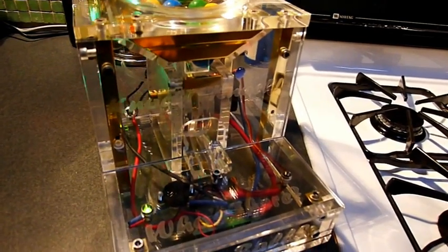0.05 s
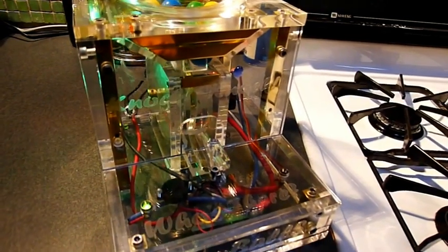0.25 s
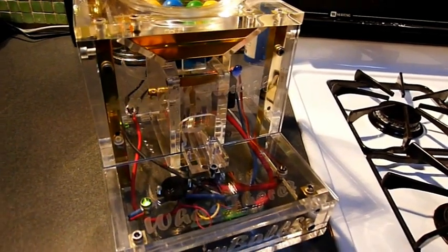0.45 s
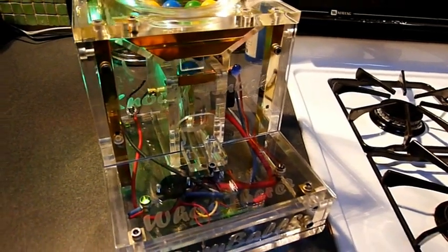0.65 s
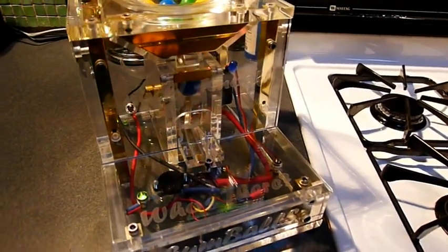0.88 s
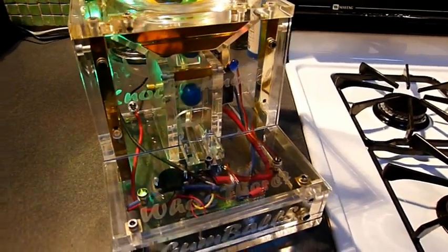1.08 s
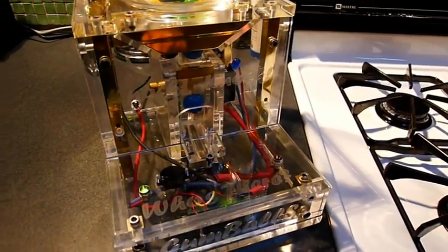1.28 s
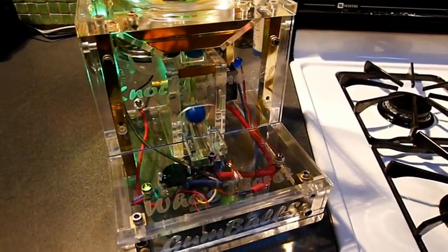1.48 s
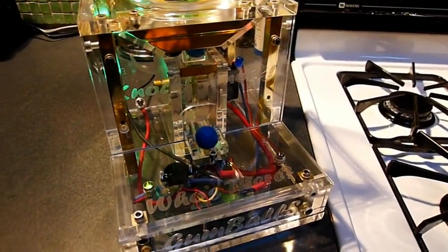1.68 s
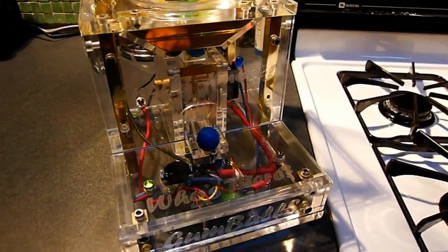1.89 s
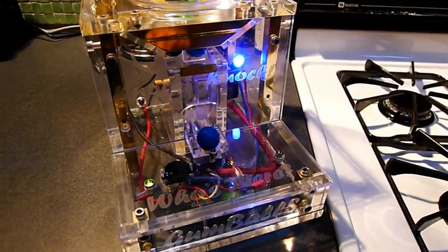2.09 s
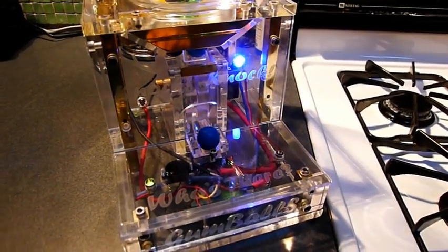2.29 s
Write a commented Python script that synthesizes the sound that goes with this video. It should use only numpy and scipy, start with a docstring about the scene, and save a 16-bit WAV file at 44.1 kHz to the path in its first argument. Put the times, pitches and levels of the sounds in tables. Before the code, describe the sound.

A gumball rattles through a plastic dispenser. A small motor rasps softly as the balls jostle, then one knocks down the chute, thuds into the tray and clacks twice, heard up close in a small kitchen.

```python
"""A servo-driven acrylic gumball dispenser on a kitchen counter, heard from close by. The servo (a small geared
motor) starts to rasp. Gumballs roll and jostle in the hopper, and one drops and knocks down the chute. At 1.5 s
it thuds into the tray, then hits the end stop with two sharp clacks. From about 2.1 s the servo rasps again, in
swells as loud as before, on to the end. A small room rings behind it all."""
import sys
import numpy as np
from scipy import signal
from scipy.fft import rfft, irfft
from scipy.io import wavfile
from scipy.ndimage import uniform_filter1d

SR = 44100
rng = np.random.default_rng(int(sys.argv[2]) if len(sys.argv) > 2 else 0)


def materialize(psi):
    """Save the field psi as 16-bit PCM at rate SR to the path in sys.argv[1].

    A 1-D psi becomes a single channel; in a 2-D psi each row is a channel.
    """
    bounded = np.clip(np.atleast_2d(psi).T, -1, 1)
    quanta = np.round(bounded * 32767).astype(np.int16)
    wavfile.write(sys.argv[1], SR, quanta)


N = 108045
HIT_SAMPLES = 8192
T, HZ = np.arange(HIT_SAMPLES) / SR, np.fft.rfftfreq(HIT_SAMPLES, 1 / SR)  # axes of one hit

# tone of a hard shell's tick: (frequency [Hz], level [dB])
TICK_TONE = [(1000, -28), (3000, 7.5), (6000, -5), (9000, -16.5), (12000, -31), (16000, -40)]
TICK_T60 = 0.021  # a "t60" is the time in seconds to fade by 60 dB; here, that of the highs


def amp(db):
    """Turns decibels into a gain."""
    return 10 ** (np.asarray(db) / 20)


def unit(x):
    """Scales a sound to an average (rms) level of 1."""
    return x / np.sqrt(np.mean(x ** 2) + 1e-20)


def unit_hit(x, hold_s=0.011):
    """Scales a hit to the energy of level 1 held for hold_s."""
    return x * np.sqrt(hold_s * SR / (np.sum(x ** 2) + 1e-20))


def read(points, hz):
    """Reads between the rows of a (frequency, value) table, spaced by octaves."""
    row_hz, value = np.transpose(points)
    return np.interp(np.log(hz + 1), np.log(row_hz), value)


def level(points):
    """Gain over the whole scene, from rows of (time [s], level [dB])."""
    return amp(np.interp(np.arange(N) / SR, *np.transpose(points)))


def add(mix, start_s, sound):
    """Mixes a sound in at the given time."""
    part = mix[..., max(round(start_s * SR), 0):][..., :sound.shape[-1]]
    part += sound[..., :part.shape[-1]]


def stereo(mid, side):
    """Left and right, from what the ears share (mid) and what sets them apart (side)."""
    return np.array([mid + side, mid - side])


def coloured(x, tone):
    """Gives a long sound the tone in a table, at level 1."""
    hz = np.fft.rfftfreq(len(x), 1 / SR)
    return unit(irfft(rfft(x) * amp(read(tone, hz)), len(x)))


def prompt_filter(log_gain):
    """The filter with this gain that answers a hit as early as it can (minimum phase)."""
    cepstrum = irfft(log_gain)
    cepstrum[1:HIT_SAMPLES // 2] *= 2
    cepstrum[HIT_SAMPLES // 2 + 1:] = 0
    return np.exp(rfft(cepstrum))


def click(tone_db):
    """One clean, hard contact with this tone."""
    return unit_hit(irfft(prompt_filter(np.log(amp(tone_db)))))


def burst(tone_db, treble_t60, rise_s=0.000067, bass_stretch=1.43):
    """A struck part's many vibrations blur into dying noise; the lows outlast the highs."""
    noise = rfft(rng.standard_normal(HIT_SAMPLES))
    lows = 1 / (1 + (HZ / 1500) ** 4)
    attack = 1 - np.exp(-T / rise_s)
    spectrum = 0
    for share, t60 in [(lows, treble_t60 * bass_stretch), (1 - lows, treble_t60)]:
        band = unit_hit(irfft(noise * share) * attack * amp(-60 * T / t60))
        spectrum += rfft(band) * np.linalg.norm(share)
    # even out the noise's chance peaks while giving it the tone
    power = abs(uniform_filter1d(abs(spectrum) ** 2, 100))
    log_gain = np.log(amp(tone_db)) - 0.5 * np.log(power + 1e-9)
    return unit_hit(irfft(spectrum * prompt_filter(log_gain)))


def mode_bank(modes, rise_s=0.0005):
    """One dying tone for each mode, a pitch at which a part naturally rings."""
    hz, db, t60 = np.transpose(modes)[:, :, None]
    return amp(db - 60 * T / t60) * np.exp(2j * np.pi * hz * T) * (1 - np.exp(-T / rise_s))


def ring(bank):
    """Rings the modes together; each hit starts them at random points in their swing."""
    phases = np.exp(2j * np.pi * rng.random((len(bank), 1)))
    return unit_hit((phases * bank).real.sum(0))


def kitchen_air(db=-53, width=0.028):
    """Quiet kitchen air: a steady, low noise."""
    # tone of the air: (frequency [Hz], level [dB])
    air_tone = [(25, -24), (85, -6), (210, -11), (750, -15.5), (2000, -22), (3500, -28), (10500, -35),
                (15000, -63)]
    mid, side = [coloured(rng.standard_normal(N), air_tone) for _ in range(2)]
    return amp(db) * stereo(mid, width * side)


def room(x, early_db=-11, early_t60=0.037, tail_db=-13.5, tail_delay_s=0.0082, width=0.009):
    """Quick echoes off the case and counter, then the kitchen's fading tail."""
    # how long the kitchen rings: (frequency [Hz], t60 [s])
    fade_times = [(125, 0.79), (500, 0.66), (2000, 0.43), (5000, 0.48), (12000, 0.23)]
    hz, t, noise = signal.stft(rng.standard_normal((2, SR // 2)), SR, nperseg=256)
    fade = amp(-60 * t / read(fade_times, hz)[:, None])
    tail = signal.istft(noise * fade, SR, nperseg=256)[1]
    t = np.arange(tail.shape[1]) / SR
    tail *= np.clip(t / tail_delay_s - 1, 0, 1)
    early = rng.standard_normal(tail.shape) * (rng.random(tail.shape) < 0.05)
    early *= amp(-60 * t / early_t60) * (t > tail_delay_s / 2)
    mid, side = sum(amp(db) * part / np.linalg.norm(part, axis=1, keepdims=True)
                    for part, db in [(tail, tail_db), (early, early_db)])
    return signal.fftconvolve(x[None], stereo(mid, width * side), axes=1)[:, :N]


def widening(x, lean_left=0.95, lag_s=0.00135, top_hz=2200):
    """Below the treble, the sound briefly spreads wide and to the left around a few hard knocks."""
    # wide moments: (time [s], half length [s], side level [dB])
    flares = [(0.21, 0.0088, 1.5), (0.297, 0.014, -1), (0.831, 0.011, -3), (1.028, 0.018, -3.5)]
    t, hz = np.arange(N) / SR, np.fft.rfftfreq(N, 1 / SR)
    lows = irfft(rfft(x) / (1 + (hz / top_hz) ** 2), N)
    late_lows = np.interp(t - lag_s, t, lows)
    width = sum(amp(db) / (1 + ((t - at_s) / half_s) ** 6) for at_s, half_s, db in flares)
    return stereo(0, width * (lean_left * lows + late_lows))


def servo(pulse_hz=50.6, kick=0.83, kick_cycles=0.15, teeth_per_s=3000, hiss=0.062):
    """Gear teeth tick and ring the gear case; each drive pulse kicks them louder."""
    # loudness of the gears: (time [s], level [dB])
    loudness = [(0, -71), (.14, -53), (.18, -46), (.56, -41.5), (.95, -49), (1.6, -56), (2.09, -57),
                (2.12, -46), (2.17, -58), (2.27, -41.5), (2.36, -47), (2.45, -42)]
    # where the gear case rings: (frequency [Hz], width [Hz], level [dB])
    resonances = [(2020, 430, 4), (2594, 120, 12.5), (2803, 180, 9.5), (3870, 240, 5), (4650, 410, 4.5),
                  (6180, 1150, -5.5), (9230, 370, -12.5)]
    hz = np.fft.rfftfreq(N, 1 / SR)
    cycle = (np.arange(N) / SR * pulse_hz) % 1
    kicks = 1 + kick * np.exp(-cycle / kick_cycles)
    teeth = rng.standard_normal(N) * (hiss + (rng.random(N) < teeth_per_s / SR))
    case = sum((-1) ** k * amp(db) * 1j * hz * width / (peak_hz ** 2 - hz ** 2 + 1j * hz * width)
               for k, (peak_hz, width, db) in enumerate(resonances))
    rasp = irfft(rfft(teeth * kicks) * case, N)
    return unit(rasp) * level(loudness)


def rolling(bumps_per_s=700):
    """The uneven sugar shells patter on the acrylic as the balls roll and rub."""
    # loudness of the rolling: (time [s], level [dB])
    loudness = [(.1, -57.5), (.2, -49), (.3, -31.5), (.5, -51), (.59, -45.5), (.68, -34), (.88, -38.5),
                (.98, -51), (1.3, -41), (1.42, -53), (1.6, -44.5), (1.79, -31), (1.86, -45.5), (2.0, -56)]
    # tone of the rolling: (frequency [Hz], level [dB])
    roll_tone = [(60, -14), (200, -16), (400, -3.5), (1200, 8.5), (2600, -5.5), (5000, -58), (12000, -70)]
    bumps = rng.standard_normal(N) * (rng.random(N) < bumps_per_s / SR)
    return coloured(bumps, roll_tone) * level(loudness)


def shell_ticks():
    """A hard shell hits an edge with a dry, bright snap."""
    # snaps: (time [s], level [dB])
    snaps = [(0.2833, -29), (0.7198, -35), (1.0028, -23)]
    out = np.zeros(N)
    for start_s, db in snaps:
        add(out, start_s, amp(db) * burst(read(TICK_TONE, HZ), TICK_T60))
    return out


def gate_rings():
    """Hard knocks on the gate and chute mouth ring briefly, each around one pitch."""
    # rings: (time [s], level [dB], pitch [Hz], width [Hz])
    hits = [(.2066, -24.5, 3970, 1330), (.825, -14, 2900, 875), (1.002, -27.5, 658, 94),
            (1.3223, -19.5, 2670, 377)]
    out = np.zeros(N)
    for start_s, db, hz, width in hits:
        tone_db = -30 * np.log10(1 + np.minimum(((HZ - hz) / width) ** 2, 400))
        add(out, start_s, amp(db) * burst(tone_db, treble_t60=0.026))
    return out


def knocks(gain_db=-4, ping_db=-5.5, panel_db=-6, spot_db=3.5, near_db=9.5, spot_octaves=0.17):
    """Gumballs knock on acrylic: a short burst, a ping of the struck spot and ringing panels."""
    # knocks: (time [s], relative level [dB], spot pitch [Hz], bass boost [dB], treble t60 [s])
    hits = [(0.105, -43, 2740, 12, 0.018), (0.198, -36.5, 992, 18, 0.043), (0.2059, -18, 2365, 12, 0.054),
            (0.212, -20.5, 1360, -2.5, 0.026), (0.2624, -19, 1960, 3.5, 0.06),
            (0.272, -15.5, 2360, 2, 0.064), (0.2826, -15, 1288, 2, 0.052), (0.292, -22, 1360, 7.5, 0.037),
            (0.3043, -21, 2374, -9, 0.056), (0.3224, -23.5, 1097, 6, 0.051), (0.3323, -22, 1293, -8, 0.06),
            (0.355, -24.5, 1260, 1, 0.057), (0.365, -19.5, 2560, 5.5, 0.033),
            (0.392, -25.5, 1680, 17, 0.024), (0.4068, -19, 1306, 6.5, 0.059),
            (0.4423, -22.5, 3030, 0, 0.011), (0.4476, -15.5, 1190, 2, 0.038),
            (0.533, -27.5, 1230, 14, 0.072), (0.6067, -22, 1227, 8.5, 0.11),
            (0.638, -24.5, 2220, 21, 0.057), (0.6499, -23, 2960, 4, 0.027), (0.659, -22, 2896, 12, 0.02),
            (0.691, -24.5, 1330, 3, 0.023), (0.7165, -16.5, 2900, 2.5, 0.03), (0.732, -26.5, 433, 24, 0.11),
            (0.746, -30.5, 2380, 5, 0.04), (0.7761, -27.5, 1063, 6, 0.11), (0.791, -23, 1800, 3, 0.024),
            (0.823, -18, 3260, 12, 0.0091), (0.825, -15, 2805, 3.5, 0.035), (0.836, -26, 2290, 9.5, 0.015),
            (0.8519, -19, 3360, 2, 0.023), (0.869, -19.5, 2314, 3, 0.041), (0.8857, -19, 1342, 4, 0.043),
            (1.002, -19, 2926, -64, 0.026), (1.014, -18.5, 2707, 2, 0.08), (1.069, -26.5, 2330, 4, 0.032),
            (1.086, -26.5, 980, -10, 0.033), (1.097, -28, 1990, 1, 0.031), (1.138, -28.5, 966, -1, 0.098),
            (1.189, -19, 2280, 1, 0.029), (1.244, -26, 1398, 6, 0.096), (1.261, -26.5, 2056, 8.5, 0.094),
            (1.291, -22.5, 2070, 4, 0.061), (1.319, -23, 1077, -3, 0.013), (1.323, -16, 2670, 3.5, 0.026),
            (1.353, -18, 1726, -3, 0.027), (1.4386, -17.5, 2306, 7, 0.05), (1.461, -20, 1270, 1, 0.055),
            (1.469, -23, 1960, 8.5, 0.15), (1.661, -25, 2170, 16, 0.051), (1.681, -25.5, 918, 19, 0.1),
            (1.719, -27, 2110, 15, 0.034), (1.7529, -28.5, 2780, 2, 0.018), (1.758, -23.5, 1590, -4, 0.021),
            (1.792, -26.5, 1460, 1.5, 0.08)]
    # tone of an average knock: (frequency [Hz], level [dB])
    knock_tone = [(50, -29), (300, -13.5), (780, -6.5), (1250, -1.5), (2000, -1.5), (2800, -3.5),
                  (3700, -8), (4900, -15.5), (6000, -21.5), (9300, -34), (12000, -79)]
    # ring of the acrylic panels: (frequency [Hz], level [dB], t60 [s])
    panel_modes = [(299.6, -9, 0.11), (660, -6.5, 0.055), (1098.4, -0.5, 0.064), (1303, -4, 0.13),
                   (1918, -7.5, 0.11), (2398, 3.5, 0.039), (3420, 2.5, 0.016)]
    out, panels = np.zeros(N), mode_bank(panel_modes)
    panel_hz = np.array(panel_modes)[:, :1]
    bass = 1 / (1 + (HZ / 850) ** 4)
    treble = 1 - 1 / (1 + (HZ / 4600) ** 6)
    for start_s, db, spot_hz, bass_db, t60 in hits:
        spot_peak = 1 / (1 + (np.log2((HZ + 1) / spot_hz) / spot_octaves) ** 2)
        treble_db = 2 * np.log2(spot_hz / 2150)  # higher-pitched spots are harder and brighter
        tone_db = read(knock_tone, HZ) + spot_db * spot_peak + bass_db * bass + treble_db * treble
        ping = amp(ping_db) * ring(mode_bank([(spot_hz, 0, 1.07 * t60)]))
        impact = burst(tone_db, t60, rise_s=0.00095)
        # panel modes near the spot's pitch ring the most
        near_gain = amp(near_db * np.interp(panel_hz, HZ, spot_peak))
        panel_ring = amp(panel_db) * ring(near_gain * panels)
        add(out, start_s, amp(db + gain_db) * (impact + ping + panel_ring))
    return out


def tray_thuds(ring_db=0.5, boom_hz=121.1, boom_t60=0.28, boom_rise_s=0.022):
    """The ball bounces in the tray: a dull thud, the tray's ring, a tick and a boom of the base."""
    # bounces: (time [s], thud level [dB], tick level [dB], boom level [dB])
    bounces = [(1.5075, -20.5, -27, -36), (1.535, -29, -40, -25.5), (1.541, -22, -31, -29.5),
               (1.554, -27, -32, -25), (1.6615, -29, -67, -93), (1.731, -25.5, -23, -44),
               (1.9165, -41, -61, -53)]
    # tone of a thud: (frequency [Hz], level [dB])
    thud_tone = [(100, -47), (310, 4), (700, -4), (1350, -1.5), (3200, -12), (8000, -56), (12000, -90)]
    # ring of the tray: (frequency [Hz], level [dB], t60 [s])
    tray_modes = [(314, -4.5, 0.13), (413, -19, 0.31), (482, -16, 0.15), (680, 6, 0.047), (890, -4.5, 0.11),
                  (1339, 4, 0.042)]
    out, tray, t = np.zeros(N), mode_bank(tray_modes), np.arange(SR // 2) / SR
    boom_shape = amp(-60 * t / boom_t60) * (1 - np.exp(-t / boom_rise_s))
    boom = unit_hit(np.sin(2 * np.pi * boom_hz * t) * boom_shape)
    for start_s, db, tick_db, boom_db in bounces:
        thud = burst(read(thud_tone, HZ), treble_t60=0.023, rise_s=0.0017)
        add(out, start_s, amp(db) * (thud + amp(ring_db) * ring(tray)))
        add(out, start_s, amp(tick_db) * burst(read(TICK_TONE, HZ), TICK_T60))
        add(out, start_s, amp(boom_db) * boom)
    return out


def end_stop_clacks(ring_db=-9, tilt_from_hz=2500, push_s=0.0016):
    """The ball's hard, very short contacts ring the end stop, over a low push."""
    # clacks: (time [s], level [dB], treble tilt [dB per octave], push level [dB])
    hits = [(1.7317, -12.5, 17, -54), (1.9166, -21.5, 0.5, -64)]
    # where the end stop rings: (frequency [Hz], width [Hz], level [dB])
    resonances = [(765, 270, -17), (1470, 85, -3), (2440, 390, -0.5), (2887, 190, 5.5), (4330, 390, -4),
                  (5210, 540, -4), (6940, 1430, -14.5), (9870, 1260, -28)]
    power = sum(amp(db) ** 2 / (1 + ((HZ - hz) / width) ** 2) ** 3 for hz, width, db in resonances)
    push = unit_hit(T / push_s * np.exp(-T / push_s))
    out = np.zeros(N)
    for start_s, db, tilt_db, push_db in hits:
        tone_db = 10 * np.log10(power + 1e-5) + tilt_db * np.log2(1 + HZ / tilt_from_hz)
        stop_ring = amp(ring_db) * burst(tone_db, treble_t60=0.017)
        add(out, start_s, amp(db) * (click(tone_db) + stop_ring))
        add(out, start_s, amp(push_db) * push)
    return out


def scene(sharp_echo_db=-6):
    """The dispenser, straight ahead, in its room; the clacks and gate rings echo less."""
    body = knocks() + shell_ticks() + tray_thuds() + rolling() + servo()
    sharp = end_stop_clacks() + gate_rings()
    echoes = room(body + amp(sharp_echo_db) * sharp)
    return body + sharp + widening(body) + echoes + kitchen_air()


def record(dry, notch_hz=7520, notch_width_hz=160, notch_db=-14, dull_hz=12300, top_hz=16400):
    """Peaks are rounded off; the microphone dips one narrow band and dulls the highs; the top is cut."""
    rounded = dry / (1 + dry ** 6) ** (1 / 6)
    hz = np.fft.rfftfreq(N, 1 / SR)
    notch = amp(notch_db / (1 + ((hz - notch_hz) / notch_width_hz) ** 2))
    microphone = notch / (1 + (hz / dull_hz) ** 10)
    heard = irfft(rfft(rounded) * microphone, N)
    top_cut = signal.firwin(255, top_hz, window=("kaiser", 9), fs=SR)
    return signal.oaconvolve(heard, top_cut[None], "same")


dry = scene()
out = record(dry)
materialize(out)
```